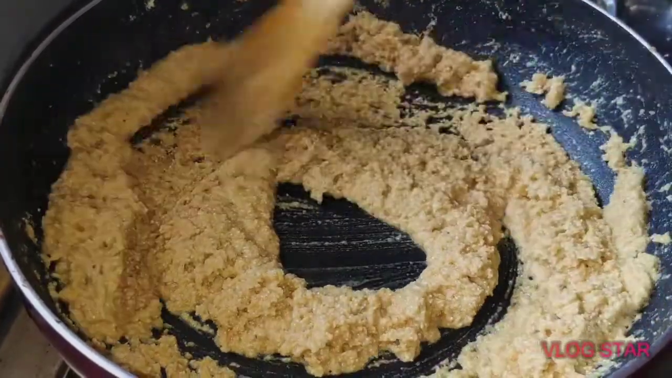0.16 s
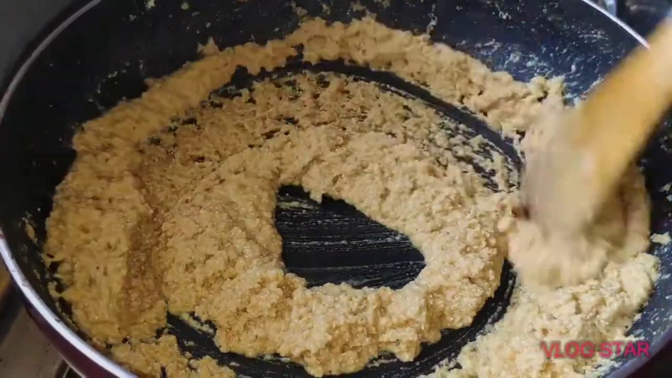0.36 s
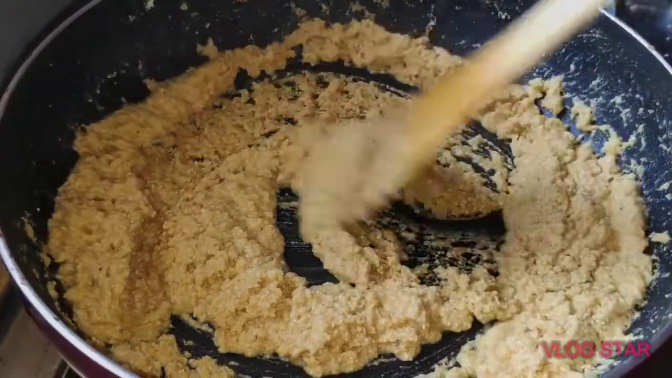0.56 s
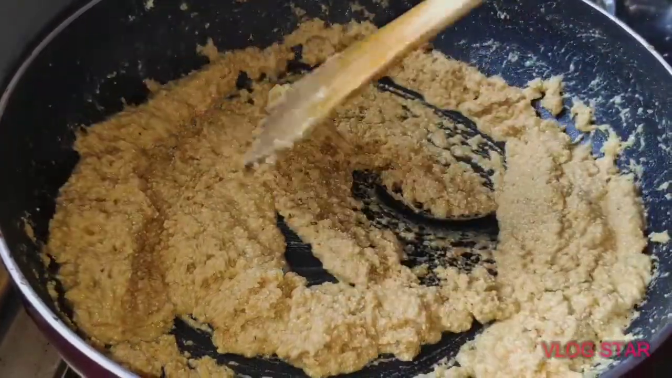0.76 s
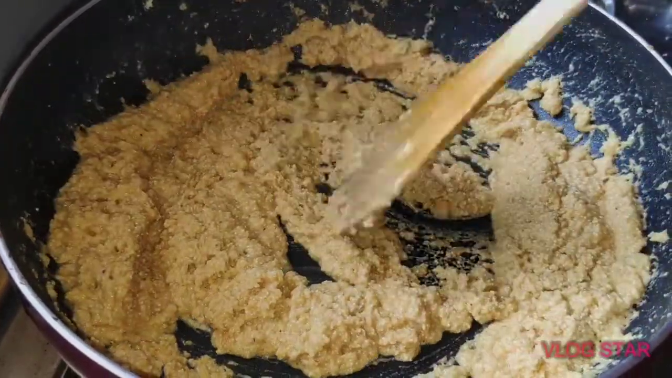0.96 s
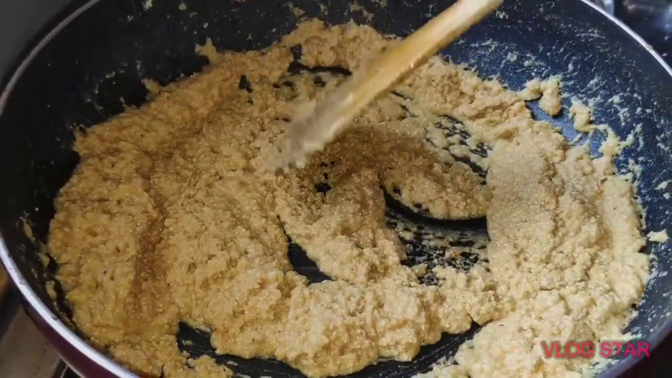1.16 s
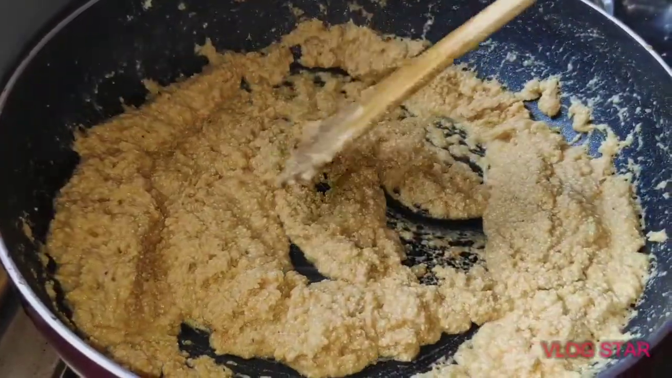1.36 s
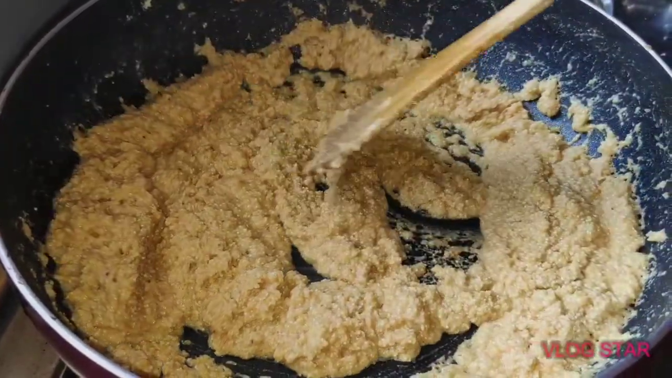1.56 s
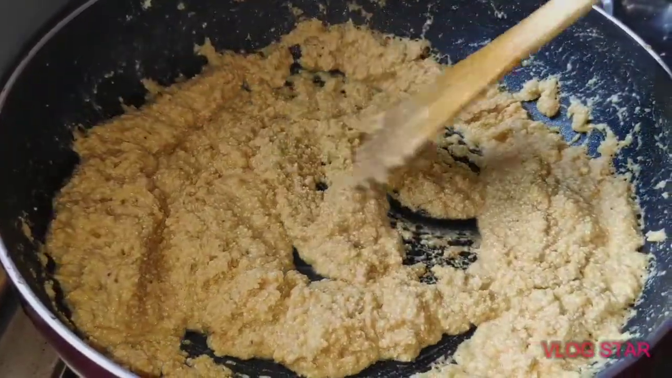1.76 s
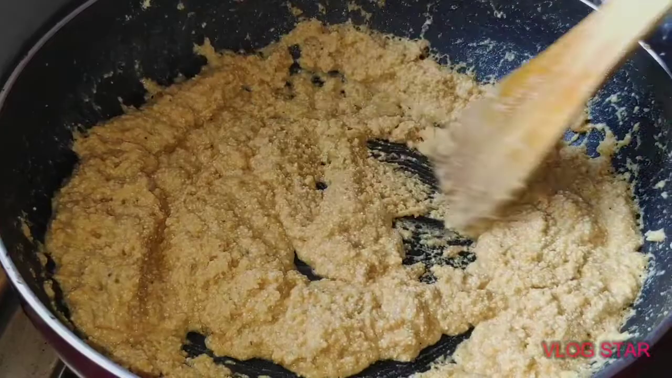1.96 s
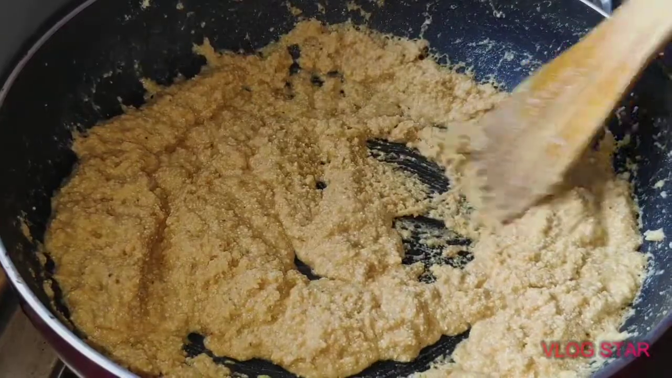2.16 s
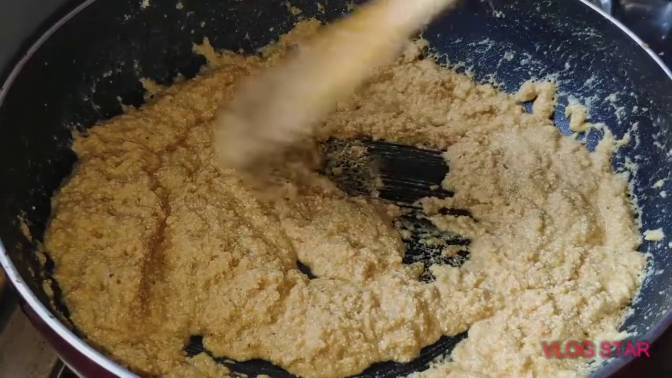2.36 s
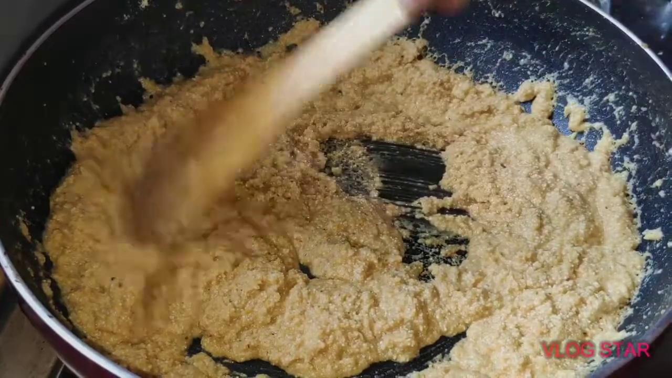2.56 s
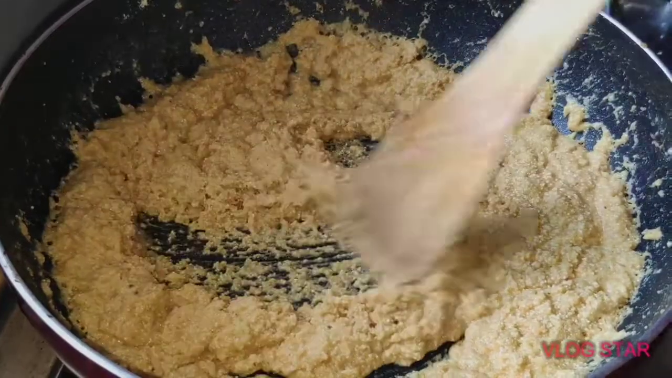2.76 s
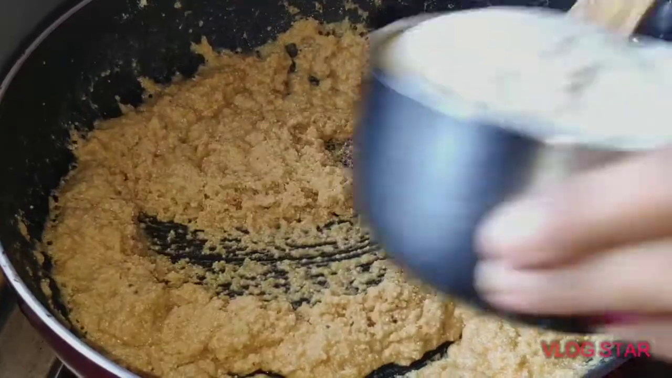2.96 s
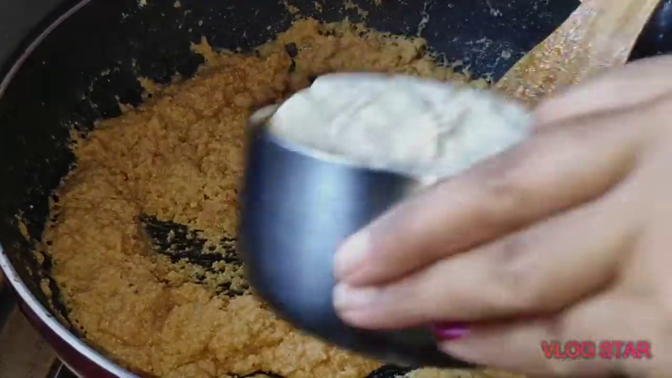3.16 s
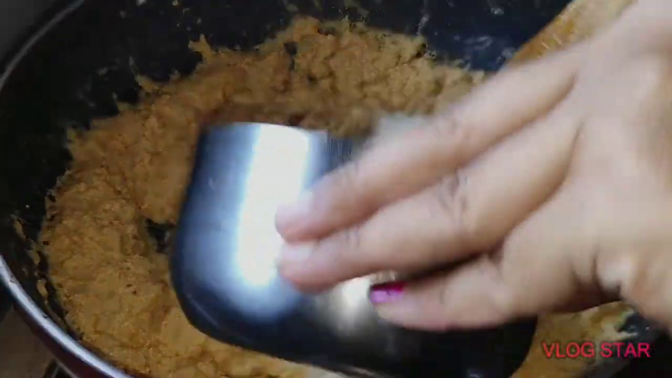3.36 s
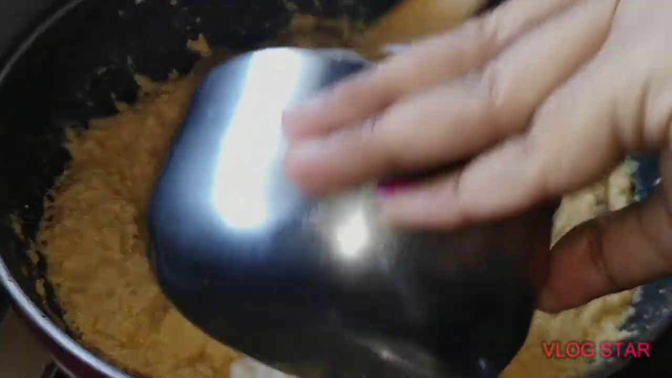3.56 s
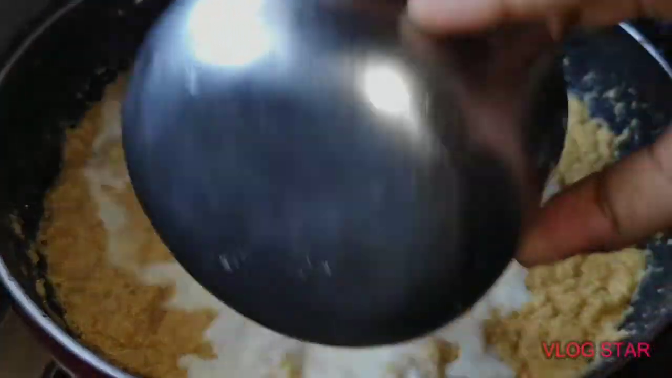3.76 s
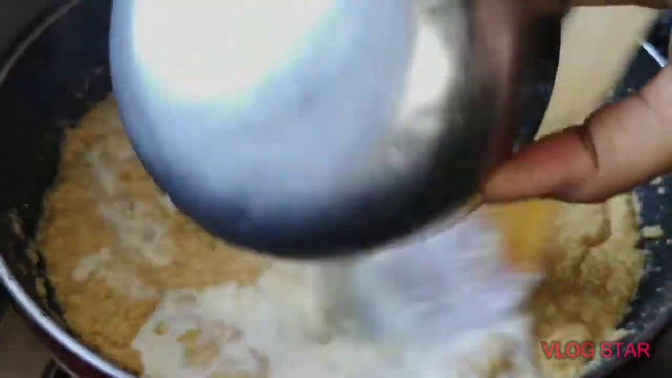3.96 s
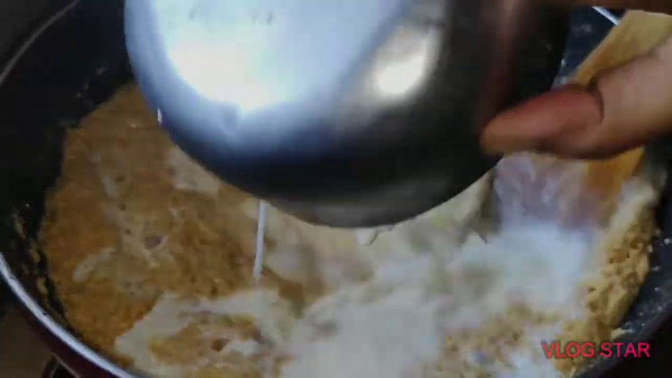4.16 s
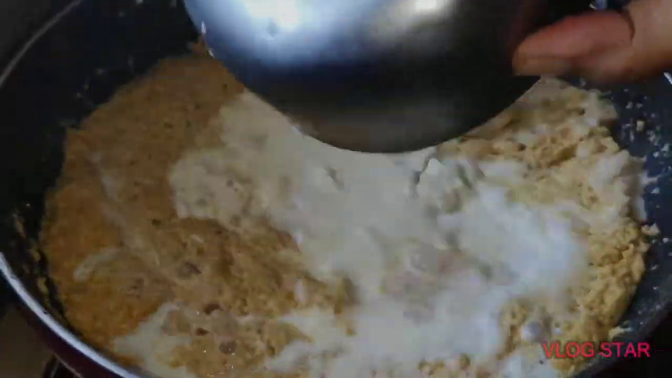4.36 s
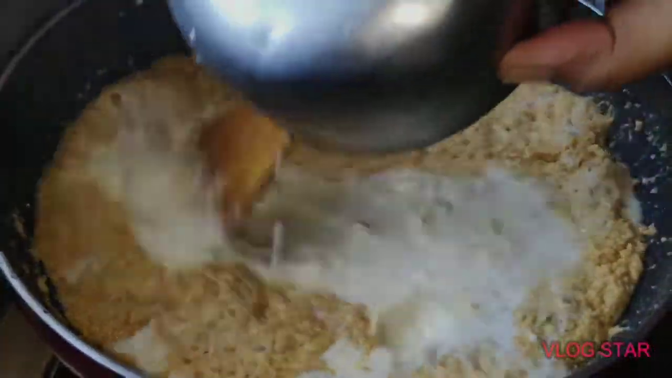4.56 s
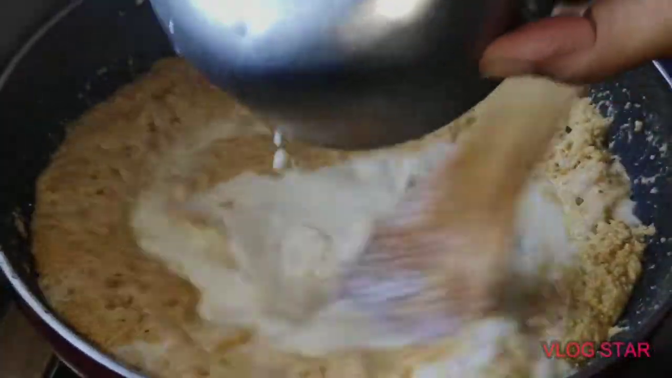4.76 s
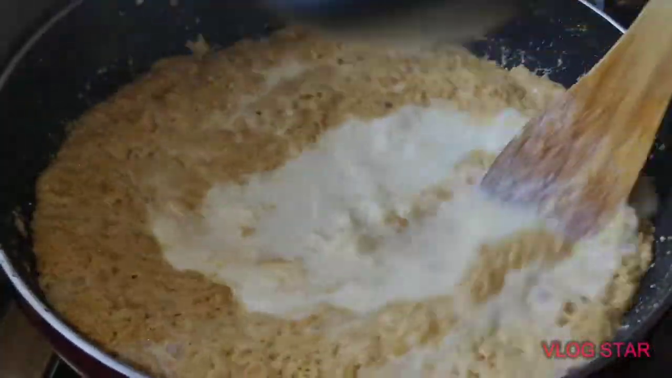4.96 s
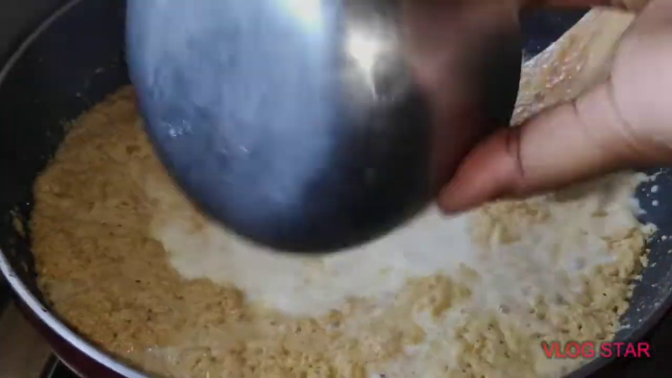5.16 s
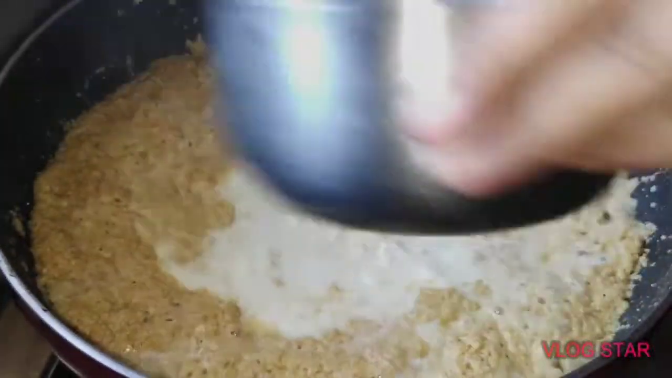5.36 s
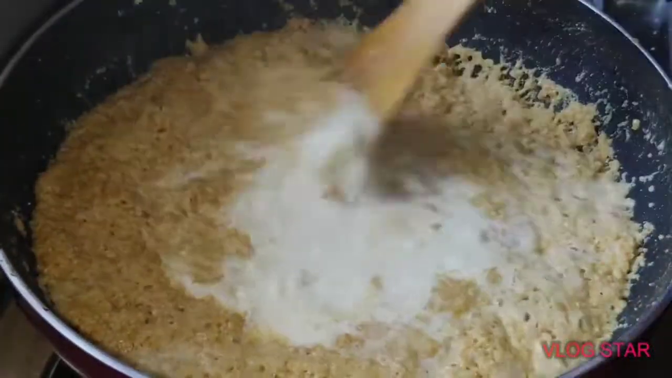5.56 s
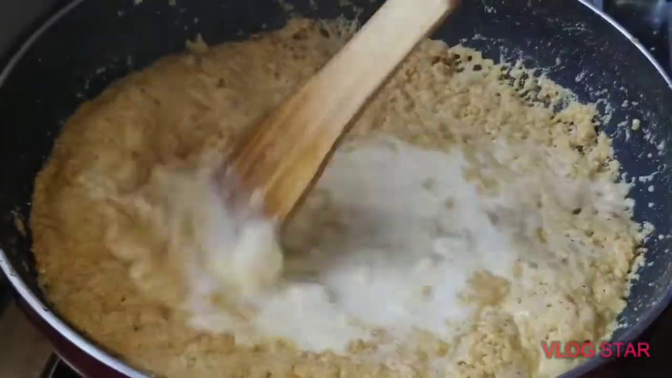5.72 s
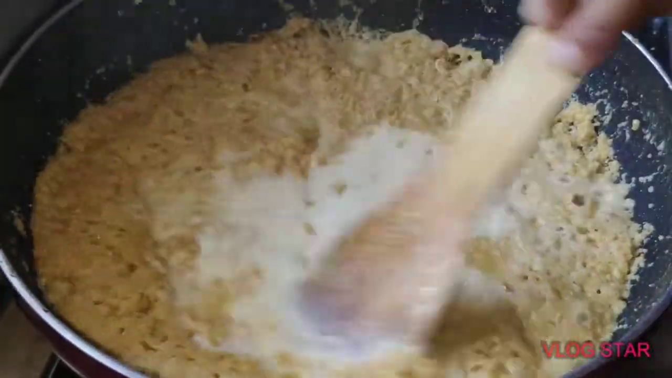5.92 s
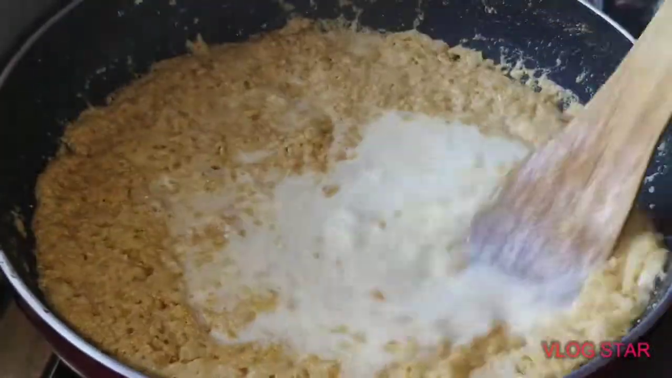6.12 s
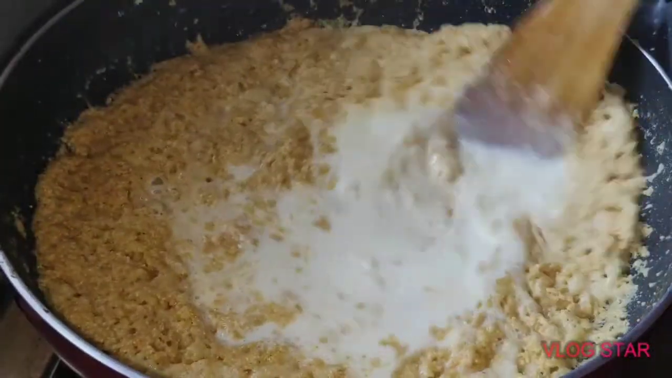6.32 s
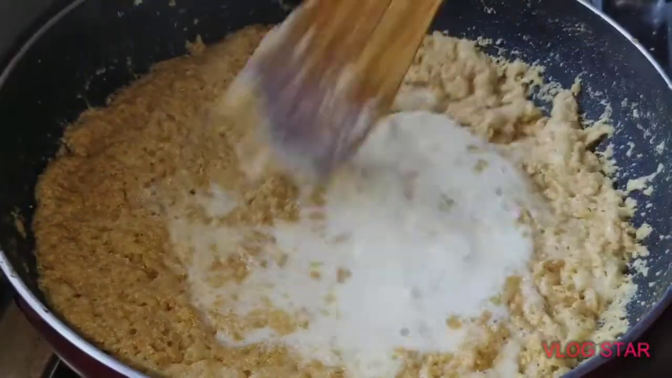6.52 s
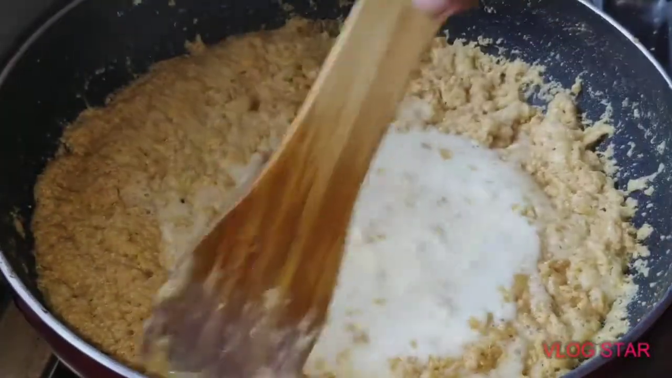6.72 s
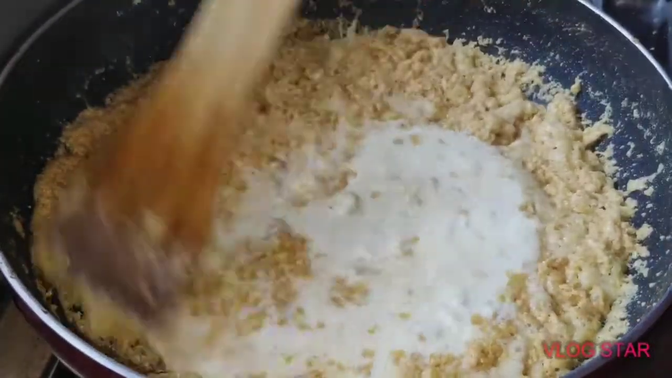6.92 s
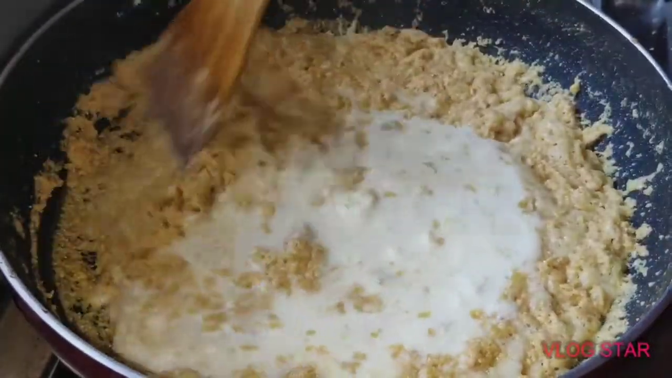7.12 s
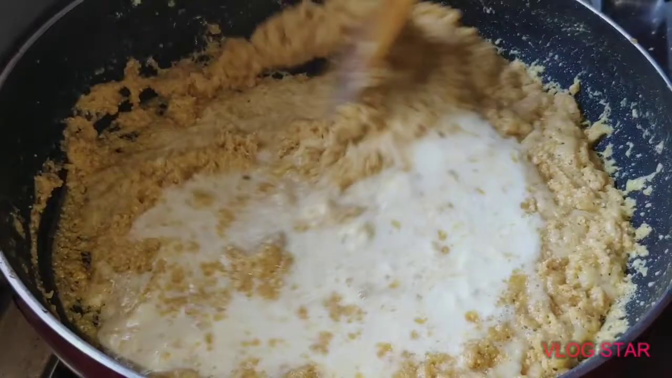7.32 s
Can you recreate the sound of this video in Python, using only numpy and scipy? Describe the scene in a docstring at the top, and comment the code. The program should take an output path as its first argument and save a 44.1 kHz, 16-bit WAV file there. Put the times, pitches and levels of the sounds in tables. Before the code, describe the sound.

A wooden spatula scrapes crumbly paste in a hot pan, then poured milk bursts into a loud, dense sizzle with woody knocks.

```python
"""A small kitchen with a low hum: a wooden spatula scrapes roasted lentil paste round a hot pan on a stove.
The paste fries faintly; milk is poured in and bursts into a dense sizzle while the spatula knocks and rubs.
Frying, sizzle and scrapes are showers of random clicks, shaped by filters, level curves and echoes.
Knocks, moans and hum are built from sine tones. Two microphone ports of unlike colour hear it from close by."""
import sys
import numpy as np
from scipy import signal
from scipy.fft import rfft, irfft, next_fast_len
from scipy.io import wavfile
from scipy.ndimage import map_coordinates

SR = 44100
rng = np.random.default_rng(int(sys.argv[2]) if len(sys.argv) > 2 else 0)


def inscribe(sig):
    """Save sig as 16-bit PCM at rate SR to the path in sys.argv[1].

    A 1-D sig is mono; a 2-D sig holds one channel per row.
    Samples are clipped to [-1, 1] before scaling.
    """
    pcm = np.round(np.clip(np.atleast_2d(sig).T, -1, 1) * 32767)
    wavfile.write(sys.argv[1], SR, pcm.astype(np.int16))


N = 330176
TIME = np.arange(N) / SR  # seconds
TOP_HZ = 15800  # nothing sounds above this

# rush of the stove, relative spectrum: pitch_hz, level_db (per Hz)
STOVE_SPECTRUM = [(12, -32), (25, -14), (38, 2), (51, -4), (70, -9.5), (100, -4), (150, -9.5), (230, -6.5),
                  (320, -17.5), (420, -16.5), (540, -14.5), (1320, -29.5), (3000, -51), (6000, -56)]
# low resonances of the kitchen: pitch_hz, width_hz, lift_db
ROOM_RESONANCES = [(38.2, 9, 3), (91.7, 8, 8), (104, 6.3, 3), (125.4, 12, 8), (176, 8.7, 7.5),
                   (318, 20, 10)]
# deep background rumble, before a steady 3 dB cut and a slow swell: time_s, level_db
RUMBLE_LEVEL = [(0.15, -62), (0.49, -59), (0.99, -58), (1.79, -56.5), (1.89, -64), (4.64, -56.5),
                (5.38, -64.5), (7.01, -61), (7.35, -68)]
# pitches of the two-tone kitchen hum: lower_hz, upper_hz
HUM_PITCHES = (68.2, 129.4)
# wavering hum, around which the level drifts: time_s, lower_rms_db, upper_rms_db
HUM_LEVELS = [(0, -65.5, -78), (0.55, -59, -76), (1.3, -70.5, -70), (2.5, -71, -68), (3.3, -62.5, -69.5),
              (5.4, -65.5, -68.5), (7.2, -61.5, -62)]

# frying paste, relative spectrum: pitch_hz, level_db (per Hz)
FRY_SPECTRUM = [(590, -30), (1000, -15), (1640, -23), (2140, -26), (4190, -6.5), (4700, -2), (11000, -2),
                (15800, -8.5)]
FRY_DB, DRYING_DB_PER_S = -53, 0.27  # gain of the frying, fading as the paste dries
TURNED_DB, SETTLE_S = 12.5, 0.12  # freshly turned paste fries harder, then settles
# single sharp ticks from paste, steam and scraping blade: time_s, peak_db (before echoes), pitch_hz
TICK_EVENTS = [(0.441, -35, 10000), (0.628, -37, 12000), (0.7324, -33, 14000), (1.282, -36, 9000),
               (1.3635, -29, 7500), (1.393, -33, 11000), (1.503, -41, 8770), (1.571, -41, 5550),
               (1.7065, -34, 9500), (1.881, -37, 9000), (2.068, -33, 7000), (2.115, -41, 5000),
               (2.196, -35, 12000), (2.286, -41, 10500), (2.515, -29, 5030), (2.573, -39, 4000),
               (2.915, -39, 12500), (3.081, -28, 6000)]
TICK_T60_S, TICK_OCTAVES = 0.0043, 0.62  # time to fade by 60 dB, and width in pitch
# moist paste pressed on hot metal spits: start_s, rise_s, hold_s, level_db, jet_pitch_hz
SPIT_EVENTS = [(1.261, .001, .005, -41, 12800), (1.282, .003, .002, -46, 8700),
               (1.296, 0.008, .012, -47, 6450), (1.3612, .002, 0.0044, -39, 8800),
               (1.376, .003, 0.011, -44.5, 13000), (1.38, .01, 0.0046, -53, 12100),
               (1.405, .01, 0.017, -55, 6760)]
# rough puff of steam, relative spectrum: pitch_hz, level_db (per Hz)
SPIT_SPECTRUM = [(710, -40), (1200, -30), (1710, -5), (2100, -23), (2500, 0), (3030, -14), (3600, -1.5),
                 (4300, -7), (5000, -3), (6670, -3.5), (13000, 1.5), (15800, -2.5)]
# steam ringing in the slit under the blade: pitch_hz, width_hz, lift_db
SLIT_RESONANCES = [(4400, 160, -2), (5870, 200, 6), (6700, 300, 8), (8800, 300, 1), (12100, 300, 3)]
JET_DB, JET_OCTAVES, SPIT_RELEASE_DB_PER_S = -10, 0.036, 600  # each jet whistles at its own pitch
# dull plops in the paste, growing as it soaks up the milk
PLOP_HZ, PLOP_OCTAVES, PLOP_DB, SOAK_S = 173, 0.59, -64, 2.2

# the gap under the tilted milk bowl is loudest at full tilt, and its pitch climbs all through the pour
TILTED_S, GAP_DB, GAP_FADE_DB_PER_S = 4.04, -54.5, 17
GAP_HZ, GAP_OCTAVES_PER_S = 690, 0.2  # pitch at full tilt
# milk runs onto bare hot metal: start_s, rise_s, hold_s, level_db, centre_hz
SEAR_EVENTS = [(3.3, .15, .55, -42, 6650)]
SEAR_OCTAVES, SEAR_DRIFT_OCTAVES, SEAR_RELEASE_DB_PER_S = 0.12, 0.05, 30

# the blade drags heavily on the pan, before a 1 dB cut and a wobble: start_s, length_s, level_db
DRAG_EVENTS = [(0.0, 0.02, -50.5), (0.06, 0.25, -65), (0.423, .03, -52), (0.525, 0.02, -53),
               (0.59, 0.14, -58.5), (2.49, .035, -66), (2.879, 0.016, -58), (3.408, .02, -57),
               (3.493, 0.11, -59), (4.56, .05, -61), (4.91, 0.086, -59), (5.375, 0.34, -57.5),
               (5.79, .015, -53), (5.82, 0.31, -58), (6.255, .06, -51), (6.686, 0.07, -51),
               (6.773, .07, -49), (6.843, 0.045, -47), (6.92, 0.16, -56.5), (7.352, 0.035, -47.5),
               (7.42, .06, -62)]
# judder of a dragging blade, relative spectrum: pitch_hz, level_db (per Hz)
DRAG_SPECTRUM = [(90, -48), (150, -22), (205, -5), (310, -3), (400, -7), (460, -2), (600, -10.5),
                 (1000, -11.5), (1400, -30), (2600, -37)]
DRAG_ATTACK_S, DRAG_RELEASE_DB_PER_S = 0.0014, 169
RUB_WIDTH_HZ, RUB_LIFT_DB = 11, 5.5  # rubbing rings the same tones of the pan as knocking
# wood sticks and slips into a short moan: start_s, end_s, pitch_hz, level_db (peak, around which it wobbles)
MOAN_EVENTS = [(0.294, 0.406, 795, -60), (6.16, 6.22, 746, -50), (6.76, 6.847, 708, -52),
               (6.92, 7.15, 649, -55)]
# spatula strokes through the paste: start_s, rise_s, hold_s, level_db (scrape and hollow together),
# grit_relative_db (before a 2 dB lift), hollow_hz, glide_octaves_per_s, hollow_width_octaves,
# hollow_relative_db (against the scrape)
STROKE_EVENTS = [(-0.015, 0.043, 0.012, -49, 2, 1000, 2.5, 0.36, 2),
                 (0.04, 0.044, 0.07, -47, 0.5, 1190, 3, 0.24, -6),
                 (0.083, 0.029, 0.015, -49, -12, 1750, 6, 0.28, 7),
                 (0.228, 0.031, 0.012, -52, 4.5, 3010, -4, .3, -15),
                 (0.298, 0.018, 0.025, -50.5, -6, 810, -2.5, 0.19, -5),
                 (0.338, 0.022, 0.03, -54.5, -1.5, 820, 1.5, 0.16, -9),
                 (0.518, .004, 0.017, -65.5, -16, 850, -4, .4, 17),
                 (0.584, .02, 0.14, -70, 1, 754, -0.5, 0.29, 15),
                 (1.293, 0.0073, 0.015, -53, -13, 1760, 3, 0.17, -5),
                 (1.339, .014, 0.049, -60.5, 8.5, 467, -5, 0.29, 1),
                 (1.707, 0.064, .008, -57.5, 0, 1340, 0, 0.35, -15),
                 (2.038, 0.037, 0.043, -47.5, -5, 870, 5, 0.45, -18),
                 (2.44, 0.045, .02, -57.5, 6.5, 550, -3, 0.33, -6),
                 (2.477, 0.029, 0.033, -47.5, -5.5, 540, 10, 0.61, -4),
                 (2.504, 0.014, 0.077, -46, -2.5, 2180, 1.5, 0.2, -3.5),
                 (2.626, 0.029, 0.007, -57.5, 4.5, 950, -2, 0.37, -8),
                 (5.827, 0.049, 0.17, -51.5, -9, 940, -4, 0.7, -14),
                 (6.222, 0.015, .025, -53.5, -5, 1350, 0, 0.12, -2),
                 (6.836, 0.0046, 0.0074, -51, -14, 1400, 3, 0.14, 6)]
# rasp of dry crumbs on metal, relative spectrum: pitch_hz, level_db (per Hz)
SCRAPE_SPECTRUM = [(200, -12.5), (360, -13), (550, -6.5), (800, -5), (1080, -4), (1700, -12), (2500, -10.5),
                   (2800, -9.5), (3400, -8), (4200, -9.5), (5500, -5), (9400, -11), (12000, -9),
                   (15800, -15)]
# resonances of pan and blade under a stroke: pitch_hz, width_hz, lift_db
RASP_RESONANCES = [(454, 40, 2.5), (780, 110, 5), (1515, 120, 7), (1805, 110, 8.5), (2400, 160, 5),
                   (3600, 160, 2), (5860, 1200, 2)]
STROKE_RELEASE_DB_PER_S, GRIT_RELEASE_DB_PER_S = 151, 113  # as the blade slows, crumbs run on a little
# the spatula knocks the pan: time_s, level_db (peak of the tock, before echoes)
KNOCK_EVENTS = [(0.027, -45), (0.428, -45), (0.532, -49), (0.733, -51), (2.751, -50), (3.41, -48),
                (3.5, -49), (3.565, -48), (4.055, -42), (4.553, -37), (4.605, -43), (4.925, -46),
                (4.991, -44), (5.786, -36.5), (6.249, -39), (6.6806, -32), (6.845, -39), (7.3405, -32),
                (7.378, -45), (7.396, -44)]
# tones of the pan with its load: pitch_hz, relative_db (before chance), t60_s (time to fade by 60 dB)
PAN_TONES = [(207, -6, .17), (222, -6, .15), (263, -1.5, 0.2), (308, 1.5, 0.17), (333, -1, 0.11),
             (382, -10.5, 0.18), (457, 0, 0.21), (535, 0, 0.17), (610, -7, .1), (724, 0, .07),
             (1040, -10, .06), (1387, 0, 0.11)]
# tones of the wooden blade, damped by the paste: pitch_hz, relative_db, t60_s
BLADE_TONES = [(272, 0, .028), (680, -4.5, .028)]
CONTACT_S, PAN_RING_DB = 0.0012, -6  # softness of the blow, and peak of the pan's ring against the tock

POUR_S = 3.083  # the milk meets the metal
# the boil, sinking as the pan cools and reviving as milk is pushed onto hot metal:
# time_s, vigour_db, spray_relative_db (finest bubbles, added to SPRAY_DB)
BOIL_LEVELS = [(3.11, -34, -4.5), (3.13, -35, -9), (3.16, -36.5, -4), (3.21, -38.5, -3), (3.24, -38.5, -2),
               (3.28, -36, -7), (3.34, -37, 0), (3.39, -33.5, -5), (3.47, -34, -2.5), (3.78, -34.5, -1.5),
               (4.13, -33, 2.5), (4.51, -35, 1.5), (4.64, -34, 2.5), (4.91, -35.5, 2.5), (5.13, -36, 1),
               (5.34, -37.5, -1.5), (5.4, -36, 2.5), (5.63, -38, 3), (5.77, -37.5, 1), (5.97, -39, 3),
               (6.32, -37.5, 3.5), (6.43, -40.5, 4), (6.79, -42, 1.5), (6.82, -41.5, 4.5), (6.96, -38.5, 2),
               (7.48, -39.5, 2)]
# sizzling milk, relative spectrum: pitch_hz, level_db (per Hz)
SIZZLE_SPECTRUM = [(150, -30), (250, -25.5), (313, -12.5), (413, -21), (451, -12.5), (527, -13), (746, -12),
                   (918, -11), (1230, -12), (2190, -5.5), (3940, -2.5), (5880, 4), (8170, -0.5),
                   (12600, -3), (15800, -6.5)]
# air resonances in the bowl of the pan: pitch_hz, width_hz, lift_db
BOWL_RESONANCES = [(201.6, 42, 18), (468, 32, 4), (617, 28, 7), (740, 72, 4.5), (1440, 300, 3),
                   (2210, 69, 2.5), (5670, 150, -0.5)]
MIDDLE_DB, SPRAY_DB = 1.5, 4.5  # middle and finest bubbles, over the vigour
LARGE_DB, POOL_S = -7, 0.068  # large bubbles over the vigour, and the time the pool needs to form them
LARGE_FADE_DB_PER_S = 0.3  # large bubbles grow rarer as the pan cools
DEEP_HZ, DEEP_POOL_S = 1310, 0.14  # the very largest bubbles, below this pitch, need a deeper pool
SPURT_S, SPURT_WIDTH_S, SPURT_DB = 3.24, 0.018, 7  # one gulp of milk flashes to steam
WETTING_S = 0.026  # how fast the sizzle sets in
# faint short rings mixed into the sizzle: level, typical pitch, its spread, cycles to die down to 1/e
RING_DB, RING_HZ, RING_OCTAVES, RING_CYCLES = -12, 3793, 0.803, 14

# left minus right port: pitch_hz, difference_db
PORT_DIFFERENCE = [(60, -3), (600, -1.5), (1500, -2.5), (1900, -4), (2250, -3), (2700, -2), (4200, -5),
                   (5600, -9), (6700, -5), (8000, 0), (10000, 8), (12000, 10.5), (15500, 10)]


def amp(db):
    """Turn decibels into gain."""
    return 10 ** (np.asarray(db) / 20)


def unit(x):
    """Scale x to rms 1."""
    return x / np.sqrt(np.mean(x ** 2) + 1e-20)


def along(points, hz):
    """Read a (Hz, value) table at any frequency, on a log pitch axis."""
    table_hz, values = np.transpose(points)
    return np.interp(np.log(hz + 1), np.log(table_hz + 1), values)


def curves(rows):
    """Draw one value per sample, along straight lines, for each column after the time."""
    times, *columns = np.transpose(rows)
    return np.array([np.interp(TIME, times, column) for column in columns])


def wobble(rate):
    """A smooth random curve with rate random points a second."""
    points = rng.standard_normal(int(N * rate / SR) + 4)
    return map_coordinates(points, [TIME * rate])


def push(start, rise, hold, release_db_per_s, t=TIME):
    """Gain of one push: it rises evenly, holds, and dies away by a steady number of decibels a second."""
    age = t - start
    rising = np.clip(age / max(rise, 0.001), 0, 1)
    return rising * amp(-release_db_per_s * np.maximum(age - rise - hold, 0))


def after(start):
    """The half second of samples that follows a start time."""
    first = max(round(start * SR), 0)
    return slice(first, first + SR // 2)


def lift_db(peaks, hz):
    """The lift in decibels that (Hz, width, dB) resonances give at each frequency."""
    return sum(db / (1 + (2 * (hz - centre) / width) ** 2) for centre, width, db in peaks)


def coloured(x, gain):
    """Filter x by a gain for each frequency, with a response that never starts before its cause."""
    half = next_fast_len(N // 2 + SR // 8)
    hz = np.fft.rfftfreq(2 * half, 1 / SR)
    # folding the cepstrum onto positive times gives the minimum-phase filter
    cepstrum = irfft(np.log(np.maximum(gain(hz), 1e-6)))
    cepstrum[1:half] *= 2
    cepstrum[half + 1:] = 0
    return irfft(rfft(x, 2 * half) * np.exp(rfft(cepstrum)))[..., :N]


def split(x, edge_hz, order=6):
    """The parts of x below and above an edge, which add up to x again."""
    m = next_fast_len(N)
    hz = np.fft.rfftfreq(m, 1 / SR)
    low = irfft(rfft(x, m) / (1 + (hz / edge_hz) ** order), m)[..., :N]
    return low, x - low


def resonance(x, centre_hz, octaves):
    """The part of x that a moving resonance picks out, at rms 1."""
    size = x.shape[1]
    hz, t, spectrum = signal.stft(x, SR, nperseg=1024)
    centre = np.interp(t, TIME[:size], centre_hz * np.ones(size))
    away = np.log2((hz[:, None] + 1) / centre) / octaves
    return unit(signal.istft(spectrum / (1 + away ** 4), SR, nperseg=1024)[1][:, :size])


def grains(rate, spread_db, size=N):
    """Random clicks of uneven size; each has its own direction, so the ports hear it a little apart."""
    count = int(rate * size / SR)
    at = rng.integers(0, size, count)
    lag = np.round(rng.normal(0.00003, 0.00015, count) * SR).astype(int)
    strength = amp(spread_db * np.minimum(rng.exponential(size=count), 4.2))
    click = rng.choice([-1, 1], count) * strength
    left = np.bincount((at + lag) % size, click, size)
    right = np.bincount(at, click, size)
    return unit(np.array([left, right]))


def kitchen(x, wet_db, t60):
    """Direct sound plus dense fading echoes from pan wall, counter and tiles, at about unchanged power."""
    t = TIME[:SR // 2]
    tail = grains(12000, 0.33, size=len(t)) * amp(-60 * t / t60) * (t > 0.001)
    tail = tail / np.linalg.norm(tail[0])
    echo = signal.fftconvolve(x * np.ones((2, 1)), tail, axes=1)[:, :x.shape[-1]]
    return (x + amp(wet_db) * echo) / np.hypot(1, amp(wet_db))


def shifting(x, wet_db, t60):
    """Echoes of a source that wanders over the pan: their colour changes six times a second."""
    out, hop = np.zeros((2, N + SR)), SR // 6
    for first in range(0, N, hop):
        piece = np.pad(x[:, first:first + hop], ((0, 0), (0, hop)))  # room for the echo to ring on
        piece = kitchen(piece, wet_db, t60)
        out[:, first:first + piece.shape[1]] += piece
    return out[:, :N]


def scattered(x, wet_db, t60):
    """Echoes of sources spread over the pan merge into a haze of clicks that follows their energy."""
    decay = amp(-60 * TIME[:SR // 2] / t60) ** 2
    energy = signal.fftconvolve(np.mean(x ** 2, axis=0), decay / decay.sum())[:N]
    haze = np.sqrt(np.abs(energy)) * grains(60000, 0)
    return (x + amp(wet_db) * haze) / np.hypot(1, amp(wet_db))


def stove():
    """A low rush of coloured noise, its deepest part swelling slowly, and a hum of two sine tones."""
    air = grains(20000, 0.98) + amp(-9.0) * rng.standard_normal((2, N))
    air = coloured(air, lambda hz: amp(along(STOVE_SPECTRUM, hz) + lift_db(ROOM_RESONANCES, hz)))
    deep, rush = split(air, 108)
    swell = amp(curves(RUMBLE_LEVEL)[0] - 3.0 + 2.1 * wobble(4.5))
    hum = np.zeros(N)
    for hz, db in zip(HUM_PITCHES, curves(HUM_LEVELS)):
        level = amp(db + 0.6 * wobble(1.5)) * np.sqrt(2)  # the root makes the level an rms one
        hum += level * np.sin(2 * np.pi * hz * TIME + 0.6 * wobble(1.5))
    return swell * unit(deep) + amp(-65.0 + wobble(3.26)) * unit(rush) + hum


def paste():
    """Frying paste crackles sparsely: clicks, coloured and fading as the paste dries."""
    turned_db = TURNED_DB * np.exp(-TIME / SETTLE_S)
    frying_db = FRY_DB - DRYING_DB_PER_S * TIME + turned_db + 1.04 * wobble(23.96)
    crackle = coloured(grains(2600, 3.3), lambda hz: amp(along(FRY_SPECTRUM, hz)))
    return scattered(crackle * amp(frying_db), wet_db=3, t60=0.14)


def plops():
    """Slow bubbles plop dully in the paste as it soaks up the milk: low, sparse clicks."""
    soaked = np.clip((TIME - POUR_S) / SOAK_S, 0, 1)

    def dull(hz):
        return np.exp(-(np.log2((hz + 1) / PLOP_HZ) / PLOP_OCTAVES) ** 2)

    return amp(PLOP_DB) * soaked * unit(coloured(grains(300, 1.1), dull))


def ticks():
    """Single sharp ticks from paste, steam and scraping blade: short noise bursts, each in its own band."""
    out, t = np.zeros((2, N)), TIME[:2048]
    for s, db, hz in TICK_EVENTS:
        noise = rng.standard_normal((2, len(t)))
        tick = resonance(noise, hz, TICK_OCTAVES) * amp(-60 * t / TICK_T60_S)
        out[:, round(s * SR):][:, :len(t)] += amp(db) * tick / np.abs(tick).max()
    return kitchen(out, wet_db=-6, t60=0.15)


def spits():
    """Steam escapes from under the blade in rough puffs, each a jet with its own whistle."""
    steam = scattered(grains(7000, 2), wet_db=-3, t60=0.03)
    rasp = coloured(steam, lambda hz: amp(along(SPIT_SPECTRUM, hz) + lift_db(SLIT_RESONANCES, hz)))
    rasp = unit(rasp)
    out = np.zeros((2, N))
    for start, rise, hold, db, hz in SPIT_EVENTS:
        span = after(start)
        jet = amp(JET_DB) * resonance(steam[:, span], hz, JET_OCTAVES)
        puff = amp(db) * push(start, rise, hold, SPIT_RELEASE_DB_PER_S, TIME[span])
        out[:, span] += puff * (rasp[:, span] + jet)
    return kitchen(out * amp(1.2 * wobble(200)), wet_db=-4, t60=0.25)


def gurgle():
    """Bubbles ring the air in the gap between the pan and the tilted milk bowl."""
    since = TIME - TILTED_S
    gap_hz = GAP_HZ * 2 ** (GAP_OCTAVES_PER_S * since)
    level = amp(GAP_DB - GAP_FADE_DB_PER_S * np.abs(since) + 1.4 * wobble(30)) * (TIME > POUR_S)
    return level * resonance(grains(400, 1.4), gap_hz, octaves=0.2)


def sears():
    """Milk running onto bare hot metal hisses in a band of its own, which drifts as the film spreads."""
    steam = scattered(grains(9000, 2), wet_db=-2, t60=0.1)
    out = np.zeros((2, N))
    for start, rise, hold, db, hz in SEAR_EVENTS:
        drifting_hz = hz * 2 ** (SEAR_DRIFT_OCTAVES * wobble(7))
        band = resonance(steam, drifting_hz, SEAR_OCTAVES)
        out += amp(db) * push(start, rise, hold, SEAR_RELEASE_DB_PER_S) * band
    return out


def drags():
    """Pressed hard, the wood judders over the pan and now and then locks into a moan."""
    modes = [(hz, RUB_WIDTH_HZ, RUB_LIFT_DB) for hz, _, _ in PAN_TONES]
    judder = coloured(grains(700, 1.4), lambda hz: amp(along(DRAG_SPECTRUM, hz) + lift_db(modes, hz)))
    pressure = np.zeros(N)
    for start, length, db in DRAG_EVENTS:
        force = amp(db) * push(start, DRAG_ATTACK_S, length, DRAG_RELEASE_DB_PER_S)
        pressure = np.maximum(pressure, force)  # the strongest drag counts
    sound = pressure * amp(-1 + 1.5 * wobble(35)) * unit(judder)
    for start, end, hz, db in MOAN_EVENTS:
        swell = np.sin(np.pi * np.clip((TIME - start) / (end - start), 0, 1))
        unsteady_hz = hz * (1 + 0.0175 * wobble(120))
        phase = 2 * np.pi * np.cumsum(unsteady_hz) / SR
        sound = sound + amp(db + 1.7 * wobble(55)) * swell * np.sin(phase)
    return shifting(sound, wet_db=-7, t60=0.22)


def strokes():
    """Crumbs catch and slip under the blade: a coarse scrape, tuned by the blade's hollow, with fine grit."""
    slips = grains(2400, 2.3) * amp(1.6 * wobble(130))
    slips = scattered(slips, wet_db=-4, t60=0.04)
    scrape, grit, hollow = np.zeros(N), np.zeros(N), np.zeros((2, N))
    for start, rise, hold, db, grit_db, hz, glide, octaves, ring_db in STROKE_EVENTS:
        span = after(start)
        t = TIME[span]
        # scrape and hollow share the level between them
        force = amp(db) * push(start, rise, hold, STROKE_RELEASE_DB_PER_S, t) / np.hypot(1, amp(ring_db))
        scrape[span] = np.maximum(scrape[span], force)
        grit_force = amp(db + grit_db) * push(start, rise, hold, GRIT_RELEASE_DB_PER_S, t)
        grit[span] = np.maximum(grit[span], grit_force)
        # the hollow between blade and paste glides while the blade pushes
        hollow_hz = hz * 2 ** (glide * np.clip(t - start, 0, rise + hold))
        hollow[:, span] += force * amp(ring_db) * resonance(slips[:, span], hollow_hz, octaves)
    rasp = coloured(slips, lambda hz: amp(along(SCRAPE_SPECTRUM, hz) + lift_db(RASP_RESONANCES, hz)))
    coarse, fine = split(rasp, 3000)
    sound = amp(1.2 * wobble(60)) * (scrape * unit(coarse) + hollow)
    sound = sound + amp(2.0 + wobble(80)) * grit * unit(fine)
    return kitchen(sound, wet_db=-6, t60=0.14)


def knocks():
    """Each blow is a short tock of the wooden blade; the damped pan rings on, at new strengths each time."""
    out, t = np.zeros(N + SR), TIME[:SR // 2]
    hz, level, t60 = np.transpose(PAN_TONES)[:, :, None]
    tock = sum(amp(db - 60 * t / life) * np.sin(2 * np.pi * f * t) for f, db, life in BLADE_TONES)
    tock = tock * (1 - np.exp(-t / CONTACT_S))
    tock = tock / np.abs(tock).max()
    for s, db in KNOCK_EVENTS:
        strength, detune = rng.standard_normal((2, len(PAN_TONES), 1))
        fade = amp(level + 2 * strength - 60 * t / t60)
        tones = fade * np.sin(2 * np.pi * hz * (1 + 0.0097 * detune) * t)
        ring = (np.sign(detune) * tones).sum(0)  # each tone starts upward or downward by chance
        ring = amp(PAN_RING_DB) * ring / np.abs(ring).max()
        out[round(s * SR):][:len(t)] += amp(db) * (tock + ring)
    return kitchen(out[:N], wet_db=-7, t60=0.28)


def short_rings(count):
    """Faint short sine rings at random times and pitches, each dying away and placed between the ports."""
    t = TIME[:256]
    at = rng.integers(0, N, (count, 1)) + np.arange(len(t))
    hz = np.minimum(RING_HZ * 2 ** (RING_OCTAVES * rng.standard_normal((count, 1))), TOP_HZ)
    size = amp(2.5 * np.minimum(rng.exponential(size=(count, 1)), 4))
    fade = np.exp(-hz * t / RING_CYCLES) * (1 - t / t[-1])
    rings = size * np.sin(2 * np.pi * hz * t) * fade
    sides = rng.uniform(-1.12, 1, (2, count, 1))  # strength in each port
    return unit(np.array([np.bincount(at.ravel(), (rings * side).ravel(), N)[:N] for side in sides]))


def milk():
    """Thousands of steam bubbles burst each second: middle ones at once, large ones as the milk pools."""
    age = np.maximum(TIME - POUR_S, 0)
    vigour_db, spray_db = curves(BOIL_LEVELS)
    pool = 1 - np.exp(-(age / POOL_S) ** 2)
    deep_pool = 1 - np.exp(-(age / DEEP_POOL_S) ** 2)
    spurt_db = SPURT_DB * np.exp(-((TIME - SPURT_S) / SPURT_WIDTH_S) ** 2)
    bursts = grains(14000, 2.35) * amp(0.45 * wobble(55))
    bursts = scattered(bursts, wet_db=-1.0, t60=0.15)
    sizzle = coloured(bursts, lambda hz: amp(along(SIZZLE_SPECTRUM, hz) + lift_db(BOWL_RESONANCES, hz)))
    large, small = split(sizzle, 3300)
    middle, spray = split(small, 9520)
    # each size of bubble swells and thins by itself; the larger ones ring on in the pan
    largest, large = split(unit(shifting(large, wet_db=-5, t60=0.12)), DEEP_HZ)
    large_level = amp(LARGE_DB - LARGE_FADE_DB_PER_S * age + 0.44 * wobble(60))
    large = large_level * (deep_pool * largest + pool * large)
    middle = unit(shifting(middle, wet_db=-8.5, t60=0.066))
    middle = amp(MIDDLE_DB + spurt_db + 0.29 * wobble(70)) * middle
    spray = amp(SPRAY_DB + spray_db + 0.34 * wobble(50)) * unit(spray)
    ringing = amp(RING_DB + spurt_db) * pool * short_rings(count=7000)
    wetted = 1 - np.exp(-age / WETTING_S)
    return wetted * amp(vigour_db) * (large + middle + spray + ringing)


def scene():
    """Everything at the stove, in stereo."""
    background = stove() + paste() + plops() + ticks() + spits()
    spatula = drags() + strokes() + knocks()
    return background + gurgle() + sears() + spatula + milk()


def record(dry):
    """The right port favours the middle treble, the left the highest; nothing passes the band limit."""
    m = next_fast_len(N + SR // 4)
    hz = np.fft.rfftfreq(m, 1 / SR)
    ports = amp(np.outer([1, -1], along(PORT_DIFFERENCE, hz)) / 2)
    ports = ports / np.sqrt(np.mean(ports ** 2, axis=0))  # both ports together stay even
    return irfft(rfft(dry, m) * ports * (hz < TOP_HZ), m)[:, :N]


dry = scene()
out = record(dry)
inscribe(out)
```